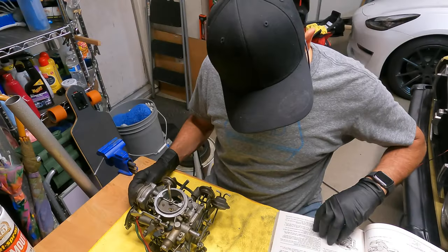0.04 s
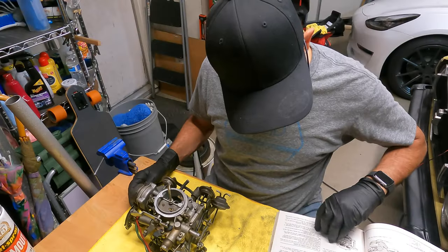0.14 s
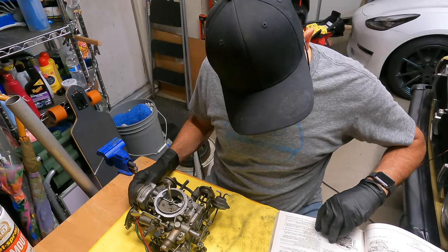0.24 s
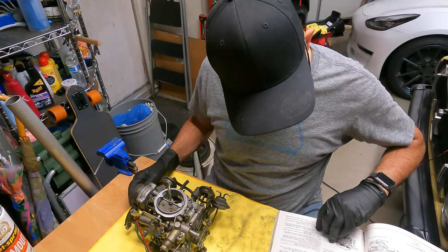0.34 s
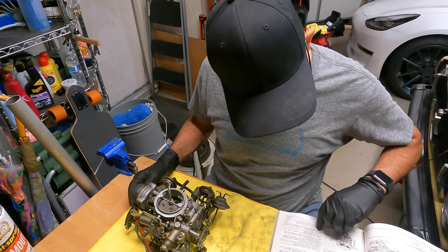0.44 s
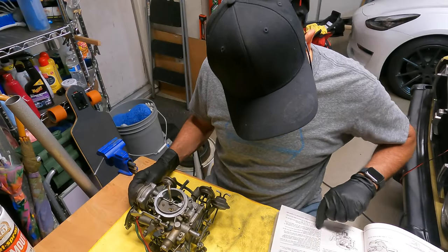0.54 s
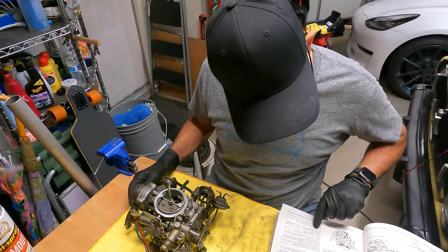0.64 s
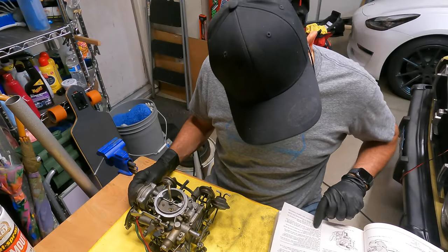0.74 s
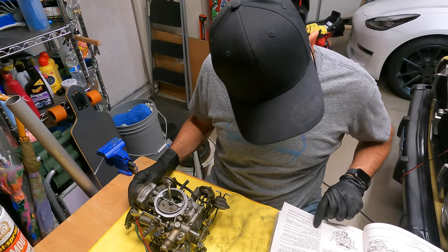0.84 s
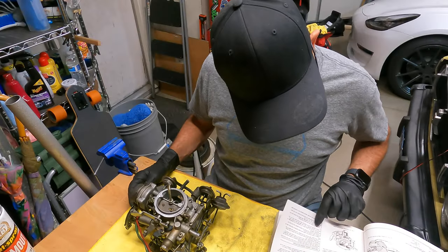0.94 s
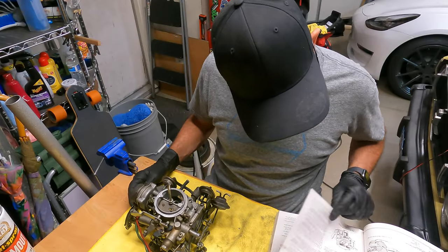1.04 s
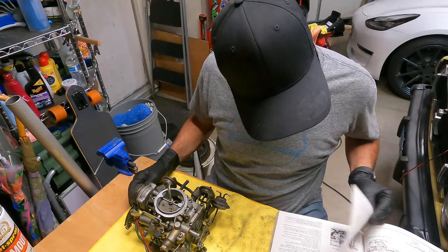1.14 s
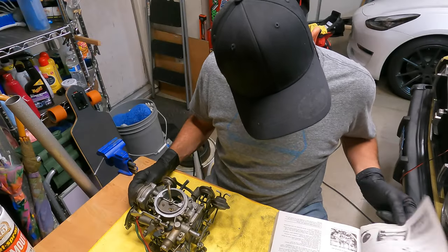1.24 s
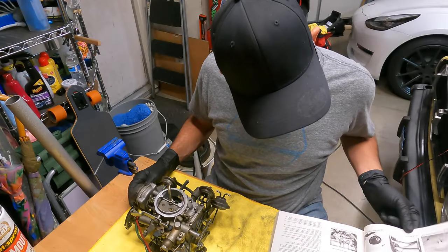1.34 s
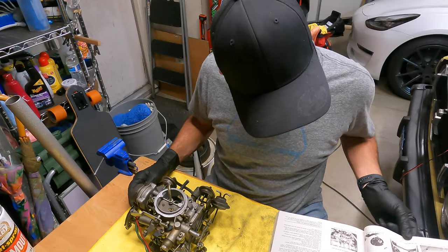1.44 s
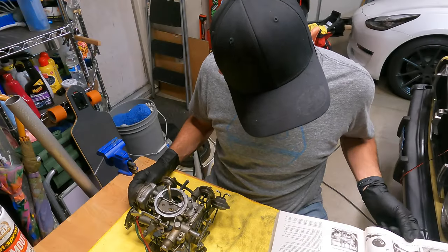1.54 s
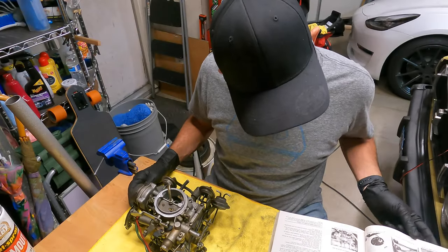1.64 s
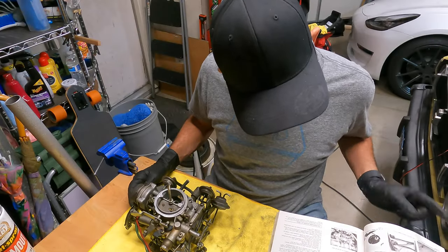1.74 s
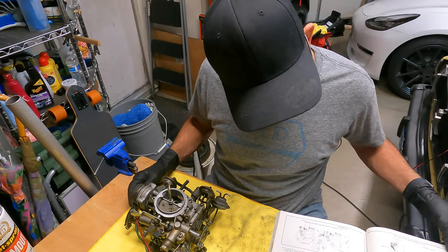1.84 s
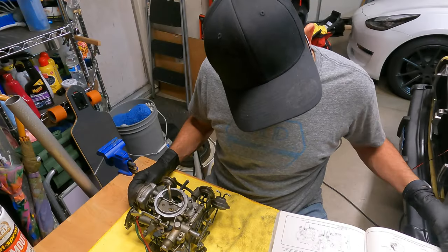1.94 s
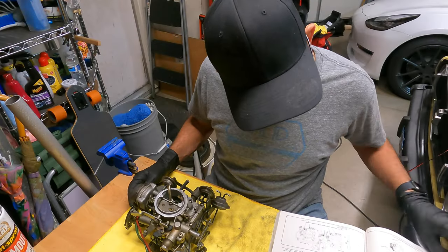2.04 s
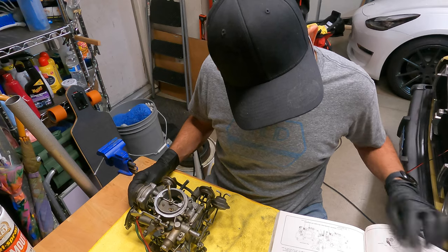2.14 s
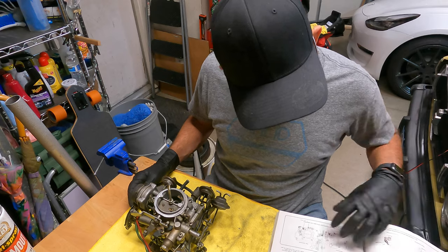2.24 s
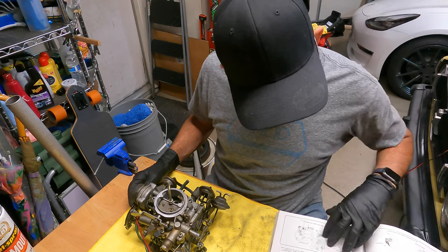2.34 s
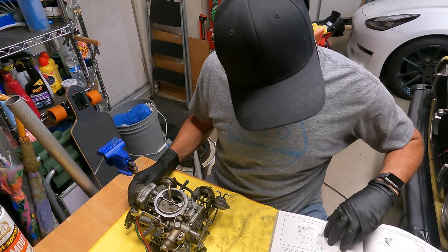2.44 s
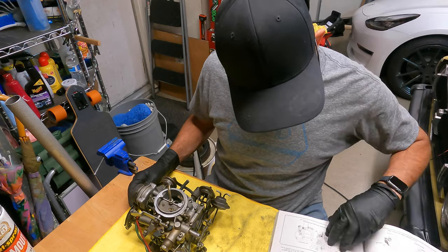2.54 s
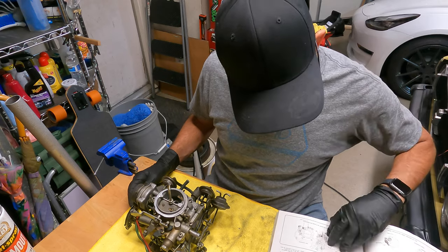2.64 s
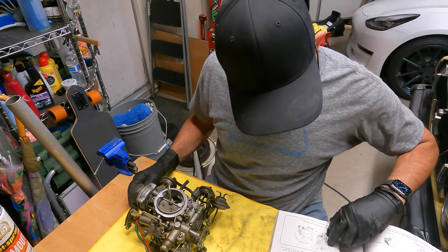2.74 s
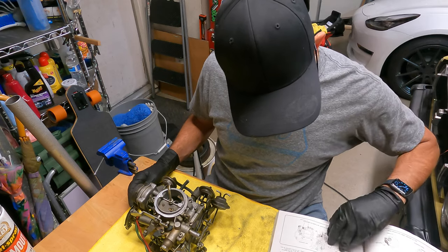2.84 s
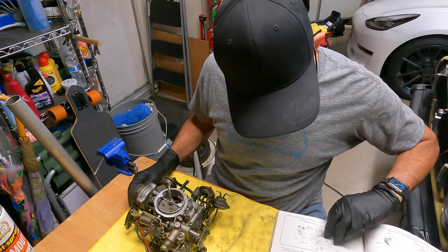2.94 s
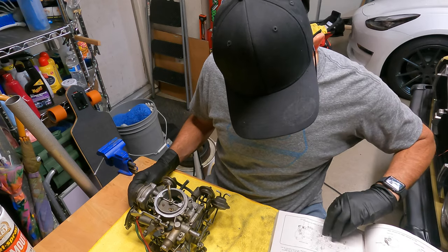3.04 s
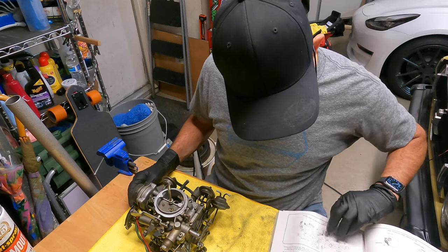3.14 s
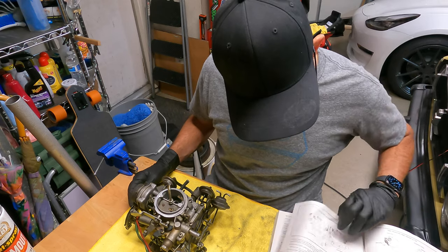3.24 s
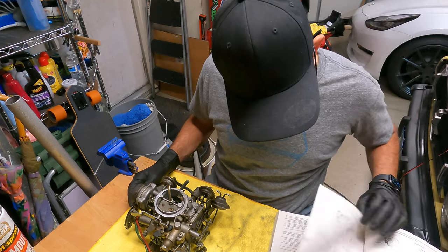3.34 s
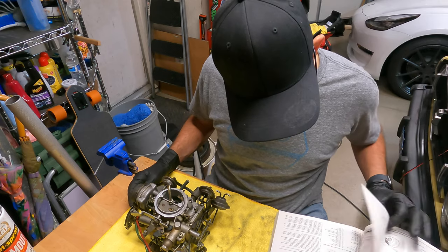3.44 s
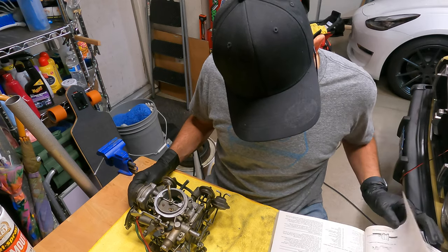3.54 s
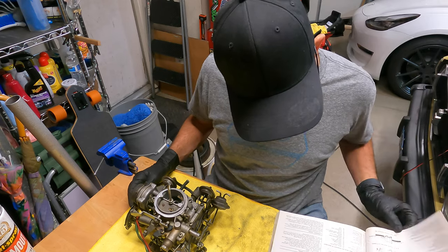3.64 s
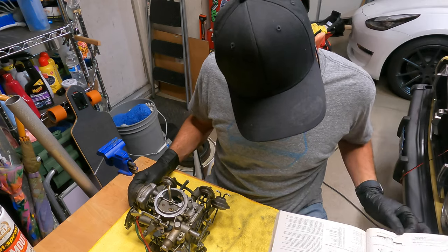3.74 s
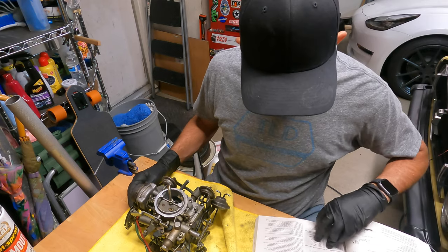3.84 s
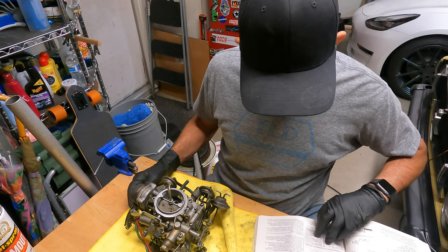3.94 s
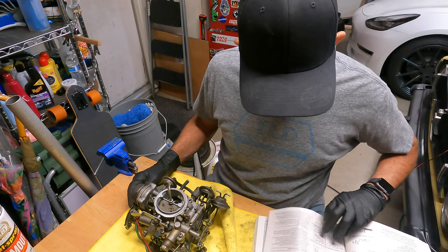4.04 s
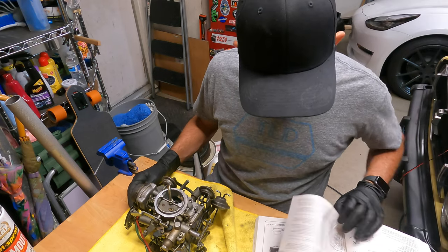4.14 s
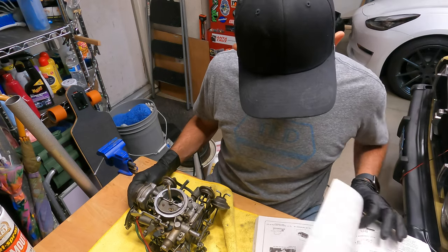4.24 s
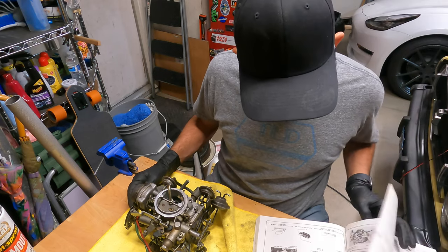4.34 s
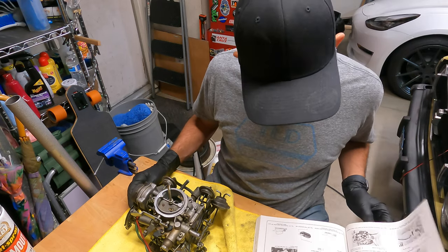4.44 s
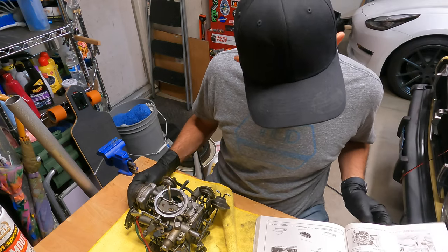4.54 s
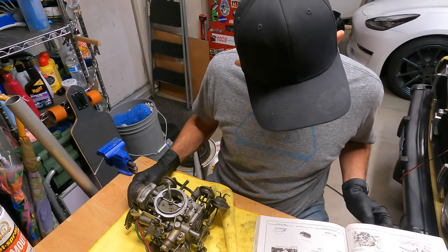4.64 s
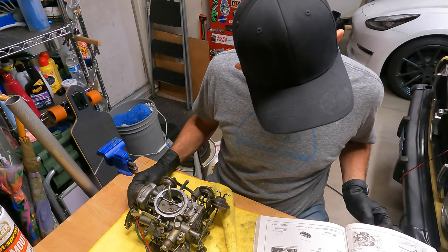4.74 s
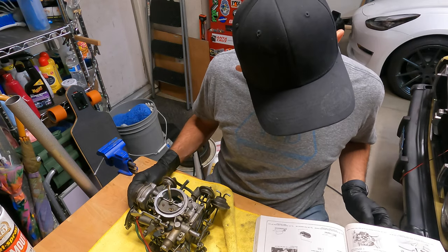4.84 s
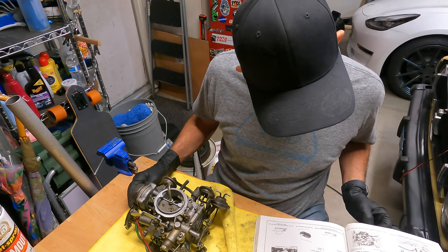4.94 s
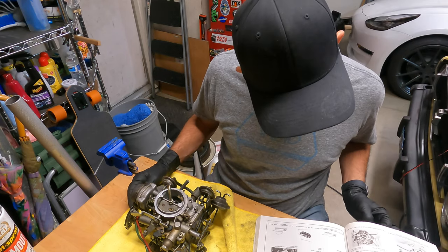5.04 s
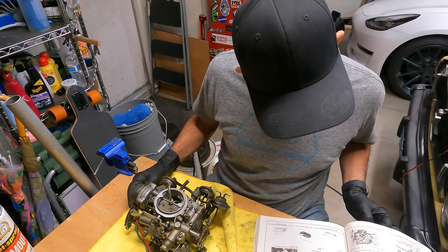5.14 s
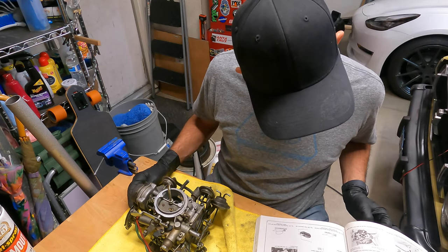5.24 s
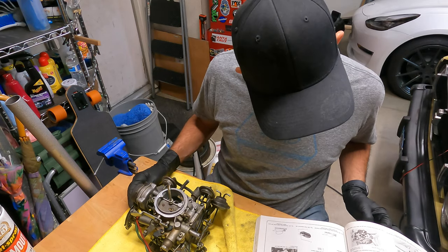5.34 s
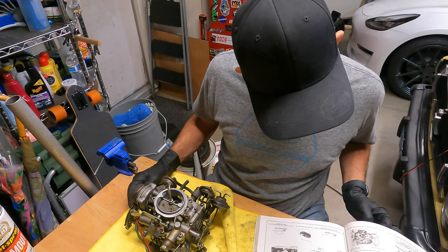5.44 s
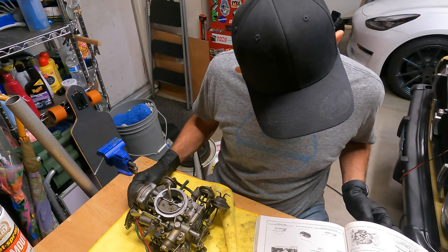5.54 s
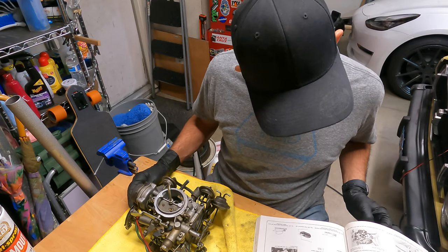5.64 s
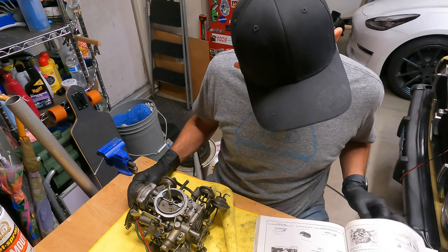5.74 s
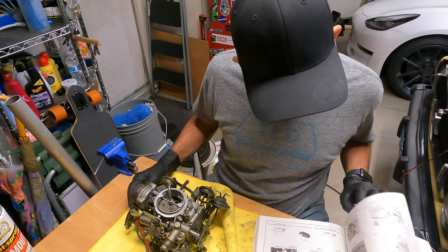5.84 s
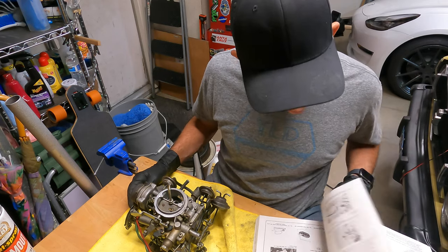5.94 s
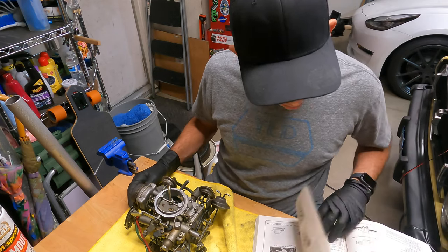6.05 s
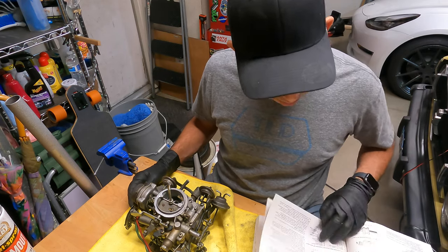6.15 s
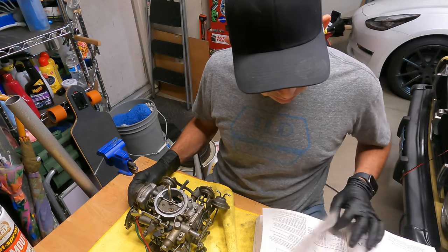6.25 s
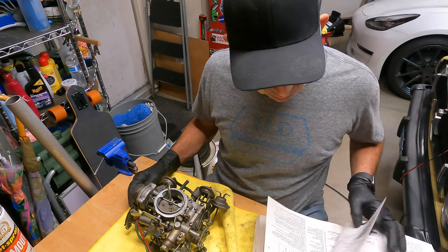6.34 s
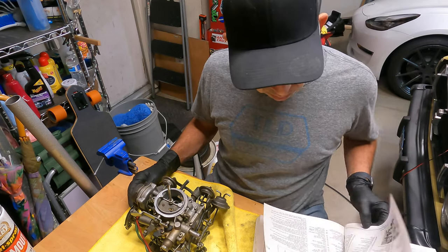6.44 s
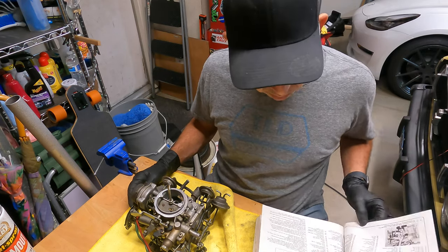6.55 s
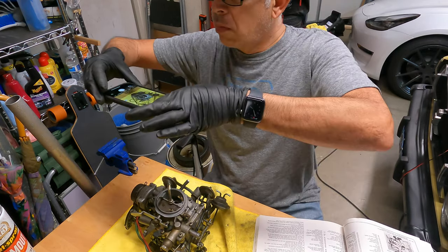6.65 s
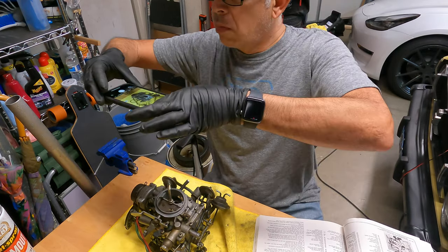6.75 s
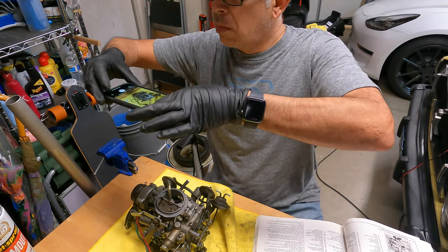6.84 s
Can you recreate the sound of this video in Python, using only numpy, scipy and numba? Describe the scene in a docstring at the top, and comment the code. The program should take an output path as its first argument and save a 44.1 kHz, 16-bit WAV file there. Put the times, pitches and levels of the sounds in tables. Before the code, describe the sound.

A close stereo microphone in a quiet garage picks up a paper manual being leafed through, slightly right of centre, with quick reflections and a short room tail. Light brushing starts at once, with a crisp corner flick at 0.6 s. Hissing slides and a soft bend follow at 1.2-1.6, then a bright swish at 1.7 that stops short near 1.9. A brief swish and low puff of air come at 2.1, then faint brushing. At 3.2-3.6 a page flips with strong crackling flaps and a puff. Small snaps at 4.1 lead to sharp flaps at 4.3 and 4.4. From 4.7 to 5.7 only faint rubbing remains while a distant low engine drone, strongest around 5, fades. At 5.8-6.6 comes a busy flurry, loudest around 6.03, with flicks and another puff. The rustle cuts off at 6.65, leaving low rumble and faint room noise.

```python
"""A quiet garage: a gloved hand leafs through a paper manual on a workbench.
Sliding sheets are noise with random catches, pitched by tightness and shaped stroke by stroke.
Bending or landing pages are short runs of snaps through a ringing patch; swung pages puff low noise.
Clutter and walls answer the rustle as decaying noise echoes.
Behind lie a swelling low rumble, far engine tones and faint room noise."""
import sys
import numpy as np
from scipy import signal
from scipy.fft import rfft, irfft, next_fast_len
from scipy.io import wavfile
from scipy.ndimage import uniform_filter1d, minimum_filter1d, map_coordinates
from numba import njit

SR = 44100
rng = np.random.default_rng(int(sys.argv[2]) if len(sys.argv) > 2 else 0)


def store_pcm(level_fs):
    """Save levels as 16-bit WAV."""
    pcm = np.round(np.clip(level_fs, -1, 1) * 32767).astype(np.int16)
    wavfile.write(sys.argv[1], SR, np.atleast_2d(pcm).T)


N = 304201
TIME = np.arange(N) / SR


def undb(db):
    """Decibels to gain."""
    return 10 ** (np.asarray(db) / 20)


def unit(x):
    """Scale to rms 1."""
    return x / np.sqrt(np.mean(x ** 2))


def colour(x, points):
    """Minimum-phase filter through (Hz, dB) points, built from the folded cepstrum."""
    size = next_fast_len(len(x) // 2 + 2048) * 2
    point_hz, point_db = np.transpose(points)
    hz = np.maximum(np.fft.rfftfreq(size, 1 / SR), 1)
    response_db = np.interp(np.log(hz), np.log(point_hz), point_db)
    cepstrum = irfft(np.log(undb(response_db)))
    cepstrum[1:size // 2] *= 2
    cepstrum[size // 2 + 1:] = 0
    return irfft(rfft(x, size) * np.exp(rfft(cepstrum)))[:len(x)]


def lowpass(x, cutoff_hz):
    """Zero-phase low-pass, so that x minus it is the matching high band."""
    sos = signal.butter(3, min(cutoff_hz, .45 * SR), fs=SR, output="sos")
    return signal.sosfiltfilt(sos, x)


def walk(rate_hz):
    """Slow chance: random levels held 1 / rate_hz and slewed; spread near 1."""
    hold = max(int(SR / rate_hz), 1)
    levels = np.repeat(rng.standard_normal(N // hold + 1), hold)
    return 1.2 * uniform_filter1d(levels, hold)[:N]


def add(out, start_s, x):
    """Mix x into out at start_s."""
    i = max(int(start_s * SR), 0)
    out[i:i + len(x)] += x[:N - i]


def even(x, bins=120):
    """Level the broad peaks of a burst's spectrum, so that a run of snaps excites all pitches alike."""
    spectrum = rfft(x, 2 * len(x))
    power = uniform_filter1d(uniform_filter1d(np.abs(spectrum) ** 2, bins), bins)
    return irfft(spectrum / np.sqrt(power))[:len(x)]


@njit
def resonate(x, centre_hz, width_hz):
    """State-variable band-pass with a moving centre, gain 1 there."""
    y, band, low = np.empty(len(x)), 0., 0.
    for i in range(len(x)):
        g = np.tan(np.pi * centre_hz[i] / SR)
        k = width_hz / centre_hz[i]
        v = (band + g * (x[i] - low)) / (1 + g * (g + k))
        band = 2 * v - band
        low = low + 2 * g * v
        y[i] = k * v
    return y


def wide(points, side_db):
    """Coloured noise, mostly shared by both channels; side_db is the opposed part against it."""
    mid = unit(colour(rng.standard_normal(N), points))
    side = unit(colour(rng.standard_normal(N), points))
    return mid + undb(side_db) * side * np.array([[1], [-1]])


# low rumble, mean level: time_s, level_db
RUMBLE_LEVEL = [(0, -51.5), (1.1, -49.5), (1.45, -46), (2.6, -49), (3.7, -51), (4.1, -42.5), (5.0, -49.5),
                (5.3, -44), (5.7, -46), (6.9, -50.5)]
# rumble spectrum, relative: freq_hz, density_db_per_hz
RUMBLE_COLOUR = [(15, -10), (27, 1), (40, 0.5), (55, 3.5), (66, 2), (86, -4.5), (105, -0.5), (135, -7),
                 (180, -8), (260, -16), (400, -35.5), (800, -59.5), (4000, -115)]
# room noise spectrum, relative: freq_hz, density_db_per_hz
AIR_COLOUR = [(150, 1.5), (300, -4), (450, -10), (850, -18.5), (1250, -10.5), (1700, -18), (2500, -27),
              (4000, -31), (7000, -29.5), (9000, -42), (11500, -41), (12000, -30.5), (12500, -60.5),
              (15500, -62.5)]


def background(lumps_db=2, lumps_hz=14, air_db=-58.5, air_waver_db=0.45, air_waver_hz=3.9):
    """Low rumble that swells and sinks unevenly, under faint, nearly steady room noise."""
    time_s, level_db = np.transpose(RUMBLE_LEVEL)
    swell_db = np.interp(TIME, time_s, level_db)
    rumble = wide(RUMBLE_COLOUR, side_db=-24.5) * undb(swell_db + lumps_db * walk(lumps_hz))
    air = wide(AIR_COLOUR, side_db=-2.5) * undb(air_db + air_waver_db * walk(air_waver_hz))
    return rumble + air


# far engine tones, mean pitch and level at the peak: pitch_hz, level_db, loudest_s, half_length_s (to 1/e)
DRONE_TONES = [(49.7, -50, 4.8, 1.1), (75.2, -46, 5.0, 1), (99.3, -54.5, 4.6, 0.36),
               (116.4, -55.5, 4.7, 1.7), (145.7, -57, 4.6, 0.31)]


def drone(wander_hz=1.2, waver_db=2):
    """Low engine tones through the walls: sines that wander a little, swell in turn and fade."""
    out = 0
    for pitch_hz, level_db, loudest_s, half_length_s in DRONE_TONES:
        phase = 2 * np.pi * np.cumsum(pitch_hz + wander_hz * walk(3.0)) / SR
        gain = np.sqrt(2) * undb(level_db + waver_db * walk(4.6))
        swell = np.exp(-((TIME - loudest_s) / half_length_s) ** 2)
        out = out + gain * swell * np.sin(phase)
    return out


# air pushed by a swinging page: peak_s, level_db (noise rms at the peak)
PUFFS = [(0.659, -45.5), (2.11, -37), (3.42, -37), (4.517, -37), (6.478, -38)]


def puffs(rise_s=0.0067, top_hz=170):
    """A swinging page fans a soft push of air: low noise that rises fast and dies away."""
    out = np.zeros(N)
    t = np.arange(SR // 8) / SR
    swell = t / rise_s * np.exp(1 - t / rise_s)
    for peak_s, level_db in PUFFS:
        push = unit(lowpass(rng.standard_normal(len(t)), top_hz))
        add(out, peak_s - rise_s, undb(level_db) * push * swell)
    return out


# rise and fall of a stroke at FIRM_DB; both times double for every SLOWER_DB below it
STROKE_ATTACK_S, STROKE_RELEASE_S, FIRM_DB, SLOWER_DB = 0.014, 0.015, -43, 14.5
# brushing before and after a stroke: level against the stroke, fading time at FIRM_DB
BRUSH_DB, BRUSH_S = -15, 0.036
# tightness: edge against the hiss at BEND_HZ, and its rise with pitch
RUB_EDGE_DB, BEND_HZ, RUB_EDGE_DB_PER_OCTAVE = 1, 4330, 13.5
# pushes of paper over paper, before sliding()'s trim: start_s, length_s, hiss_level_db,
# body_db (hollow body against the hiss), hiss_pitch_hz
STROKES = [(0.024, .08, -55.5, 2, 4780), (0.202, .075, -52.5, -0.5, 3404),
           (0.468, 0.025, -55.5, -2.5, 3320), (0.522, 0.12, -49, 0, 4060), (0.602, .06, -40, 1, 3520),
           (0.721, 0.063, -48, -6, 3980), (1.01, .025, -68, 3, 4590), (1.314, .028, -49.5, 0.5, 6170),
           (1.384, .105, -41.5, -7, 4810), (1.487, .07, -55.5, 19, 5000), (1.7, .05, -38.5, -3, 4860),
           (1.758, .115, -48, 2.5, 4500), (2.058, .055, -35.5, -9.5, 5150), (2.174, .1, -48.5, 7, 4290),
           (2.301, 0.11, -56, 8.5, 4500), (2.527, .045, -50.5, -1, 3890), (2.619, .11, -52.5, 6.5, 4240),
           (2.956, .26, -59, 2.5, 4164), (3.061, 0.046, -50, 1, 3600), (3.228, 0.055, -45.5, -9.5, 4600),
           (3.297, .08, -58, 8.5, 5080), (3.465, 0.061, -44.5, 3.5, 4165), (3.549, 0.068, -45.5, 2, 4920),
           (3.611, .075, -50, 5, 4695), (3.945, 0.14, -57.5, 5.5, 4400), (4.087, 0.16, -52, 5, 4920),
           (4.328, 0.07, -51.5, 14, 4426), (4.393, .12, -47, 9, 4024), (4.608, 0.097, -60.5, 7.5, 4680),
           (4.726, .15, -56, -2, 4200), (5.069, .125, -61.5, 2.5, 3670), (5.243, .04, -60.5, 8.5, 3900),
           (5.335, 0.031, -67, -1, 4005), (5.83, 0.056, -45.5, 4, 4780), (5.863, 0.17, -40, 2.5, 4520),
           (6.062, .09, -49, 16.5, 4220), (6.163, 0.2, -55.5, 6.5, 4890), (6.286, 0.11, -48, 8.5, 5690),
           (6.411, 0.056, -47.5, -1, 4225), (6.453, .075, -41, 8, 4370), (6.58, 0.084, -64, 12, 4880)]


def strokes():
    """Hiss gain, body gain against it and hiss pitch over time; where strokes overlap the louder leads."""
    hiss, body = np.full(N, 1e-14), np.full(N, 1e-14)  # power floor
    pitch = np.full(N, 1e-14 * BEND_HZ)
    for start_s, length_s, hiss_level_db, body_db, hiss_pitch_hz in STROKES:
        near = np.abs(TIME - start_s - length_s / 2) < .5
        t = TIME[near] - start_s
        slow = 2 ** ((FIRM_DB - hiss_level_db) / SLOWER_DB)
        rise = (1 + np.tanh(2 * t / (slow * STROKE_ATTACK_S))) / 2
        fall = (1 - np.tanh(2 * (t - length_s) / (slow * STROKE_RELEASE_S))) / 2
        # the glove already brushes the page before a stroke and lingers after it
        outside_s = np.maximum(np.abs(t - length_s / 2) - length_s / 2, 0)
        brush = undb(BRUSH_DB) * np.exp(-outside_s / (slow * BRUSH_S))
        power = undb(hiss_level_db) ** 2 * ((rise * fall) ** 2 + brush ** 2)
        hiss[near] += power
        body[near] += power * undb(body_db) ** 2
        pitch[near] += power * hiss_pitch_hz
    return np.sqrt(hiss), np.sqrt(body / hiss), pitch / hiss


# hiss level at which the pitched ring is halved
DAMPED_DB = -48
# hollow resonance of the bowed sheet: wander is octaves per unit of walk()
BOW_HZ, BOW_WIDTH_HZ, BOW_WANDER_OCTAVES, BOW_RATE_HZ, BOW_GAIN = 1450, 210, .35, 14, 1
# sliding paper spectrum, relative: freq_hz, density_db_per_hz
RUB_COLOUR = [(100, -5.5), (250, -9), (430, -5), (650, -3), (850, -10), (1300, 2), (2300, 0.5), (3800, 0),
              (5600, -2), (7500, -10), (10000, -19), (12500, -24.5), (15500, -51)]


def sliding(trim_db=1.0, catch_rate_hz=600, catch_db=-3.5, catch_spread_db=2.5, judder_db=2.0,
            wobble_db=1.9, body_hz=2200, edge_hz=6800, ring_gain=0.87, ring_width_hz=800):
    """Fibres brush past each other and now and then catch; sheet body and edge radiate the friction."""
    hiss_gain, hollow, pitch_hz = strokes()
    sizes = undb(catch_spread_db * np.minimum(rng.exponential(size=N), 5))
    caught = rng.random(N) < catch_rate_hz / SR
    catches = caught * sizes * rng.choice([-1, 1], N)
    friction = colour(rng.standard_normal(N) + undb(catch_db) * unit(catches), RUB_COLOUR)
    # a light touch leaves the sheet free to ring
    ring = ring_gain / (1 + hiss_gain / undb(DAMPED_DB))
    friction = unit(friction + ring * resonate(friction, pitch_hz, float(ring_width_hz)))
    body, below_edge = lowpass(friction, body_hz), lowpass(friction, edge_hz)
    # the hollow resonance wanders as the sheet's curve changes
    bow_hz = np.clip(BOW_HZ * 2 ** (BOW_WANDER_OCTAVES * walk(BOW_RATE_HZ)), 1, SR / 4)
    bow = resonate(body, bow_hz, float(BOW_WIDTH_HZ))
    body = (body + BOW_GAIN * bow) / np.sqrt(1 + BOW_GAIN / 2)
    # the loose sheet wobbles on its own
    body_gain = hollow * undb(wobble_db * walk(110))
    # a tighter bend hisses higher and sheds more from its edge
    edge_db = RUB_EDGE_DB + RUB_EDGE_DB_PER_OCTAVE * np.log2(pitch_hz / BEND_HZ)
    x = body * body_gain + below_edge - body + (friction - below_edge) * undb(edge_db)
    # the hand never moves evenly
    return x * hiss_gain * undb(trim_db + judder_db * walk(70))


# flapping sheet spectrum, relative: freq_hz, density_db_per_hz
FLAP_COLOUR = [(50, -33), (140, -3), (260, -11), (430, -10.5), (750, -6.5), (1200, -0.5), (2200, 0.5),
               (3600, -5.5), (5200, -8), (7000, -18.5), (9500, -34), (12500, -40.5), (15500, -61.5)]


def buckle(level_db, length_ms, crack_db, edge_db, patch_hz, diffuse, snaps_per_ms=1.8, spread_db=3.5,
           flutter_db=-22, flutter_s=0.0042, ring_gain=1.0, damping=0.13):
    """A crease runs across the sheet in a few snaps; the sheet flutters briefly after each."""
    t = np.arange(SR // 10) / SR
    count = min(1 + int(length_ms * snaps_per_ms), 64)
    place, size = rng.random(count), rng.standard_normal(count)
    sign = rng.choice([-1, 1], count)
    at = (np.arange(count) + place) / count * length_ms * SR / 1000  # samples
    if diffuse:  # summed over all directions the snaps merge into one pulse
        run = signal.unit_impulse(len(t), int(at.mean()))
    else:
        snaps = np.bincount(at.astype(int), sign * undb(spread_db * np.minimum(size, 1)), len(t))
        flutter = undb(flutter_db) * rng.standard_normal(len(t)) * np.exp(-t / flutter_s)
        flutter[0] = 1
        run = even(signal.fftconvolve(snaps, flutter)[:len(t)])
    # the bent patch rings for a few cycles
    patch = resonate(run, np.full(len(t), float(patch_hz)), float(damping * patch_hz))
    run = run + ring_gain * patch
    # a tight crease is bright, a broad slack bend is hollow
    tightness = [(1700, 0.013), (3300, crack_db), (5000, crack_db),
                 (8500, crack_db + edge_db), (13000, crack_db + edge_db / 2)]
    x = colour(colour(run, FLAP_COLOUR), tightness)
    return x * undb(level_db) * np.sqrt(SR / 100 / np.sum(x ** 2))  # energy as rms over 10 ms


# edge falls to 0 dB against the crack at EDGE_AT_DB
EDGE_AT_DB, EDGE_LOSS_DB_PER_DB = -28.5, 0.7
# flicks: crack against the body, pitch of the corner
FLICK_CRACK_DB, FLICK_HZ = 20, 4130
# a sheet bends over or lands, before the room: start_s, level_db (rms over 10 ms), run_length_ms,
# crack_db (4 kHz against body), patch_hz
FLAPS = [(0.297, -48, 3.3, -7.5, 1410), (0.34, -48, 2.45, -5, 1170), (0.591, -33, 0.46, -30.5, 1110),
         (1.238, -32, 11.3, -16.5, 1230), (1.515, -32.5, 30.4, -16, 1140), (1.706, -31.5, 11, 3, 4040),
         (1.74, -38, 9.8, -10, 1200), (1.831, -38, 6, -6, 1400), (2.684, -42, 3, 10.5, 1550),
         (2.696, -35.5, 4.8, 0, 2230), (3.189, -48.5, 1.2, -16.5, 1140), (3.368, -40, 1.9, -17, 1460),
         (3.3914, -27, 2.9, -2.5, 1290), (3.3991, -20.5, 5.4, -2.5, 1440), (3.4152, -16.5, 5, 4, 1350),
         (3.423, -23.5, 17.3, -11, 1400), (3.451, -27.5, 14.3, -17, 1150), (3.578, -28, 11, -12.5, 1880),
         (4.006, -37.5, 3.95, -5, 1220), (4.1105, -29, 1.22, -1, 1500), (4.133, -28.5, 1.12, 0, 1730),
         (4.216, -42.5, 3.8, -17, 1100), (4.304, -32, 1.15, -6, 1170), (4.309, -21, 3.4, 3, 1166),
         (4.363, -35, 6, -15, 1200), (4.4303, -18.5, 5.5, 3.5, 1510), (5.056, -43, 7.2, -19.5, 1320),
         (5.858, -37, 7.3, -24.5, 1390), (5.898, -29.5, 2, 13, 1480), (5.912, -32.5, 12, -19, 1210),
         (5.966, -27.5, 6.8, 3.5, 1790), (6.026, -24, 7.2, -16.5, 2210), (6.0331, -14, 6.7, 1, 1660),
         (6.042, -17.5, 6.5, 13.5, 2140), (6.049, -22.5, 7.3, -19.5, 1940), (6.078, -33.5, 20, 7, 1600),
         (6.111, -36.5, 3.3, 2, 1750), (6.261, -39.5, 7, -7, 1210), (6.328, -30, 5.5, -7.5, 1680),
         (6.342, -24, 2.16, -14, 1710), (6.358, -27.5, 8.8, -13.5, 1370), (6.397, -36, 19, -17, 1170),
         (6.563, -35.5, 4.5, -4.5, 2055)]
# a taut corner flicks free, before the room: start_s, level_db (rms over 10 ms), run_length_ms,
# edge_db (above 8.5 kHz against crack)
FLICKS = [(0.6155, -21.5, 1, 15.5), (2.46, -46, 3, 12), (6.1335, -24, 0.45, 11.5),
          (6.4663, -22.5, 15.5, 12.5)]


def buckles(diffuse):
    """Flaps and flicks: the harder the flap, the more sheet moves and the less its edge stands out."""
    out = np.zeros(N)
    for start_s, level_db, length_ms, crack_db, patch_hz in FLAPS:
        edge_db = -EDGE_LOSS_DB_PER_DB * (level_db - EDGE_AT_DB)
        add(out, start_s, buckle(level_db, length_ms, crack_db, edge_db, patch_hz, diffuse))
    for start_s, level_db, length_ms, edge_db in FLICKS:
        add(out, start_s, buckle(level_db, length_ms, FLICK_CRACK_DB, edge_db, FLICK_HZ, diffuse))
    return out


def garage(toward, around, early_db=-10, early_s=0.02, tail_db=-13, t60_low_s=0.32, t60_high_s=.3,
           split_hz=5500, side_db=-2, direct_db=-2.0, lag_ms=0.014, left_db=1.0, right_db=2.0):
    """Direct sound, quick reflections from nearby clutter and a short room tail."""
    t = np.arange(SR * 3 // 4) / SR

    def fade(t60_s):
        return np.exp(-np.log(1000) * t / t60_s)

    def share(h, level_db):
        return h * undb(level_db) / np.sqrt(np.sum(h ** 2))

    def reflections():
        early, late = rng.standard_normal((2, len(t)))
        low = lowpass(late, split_hz)
        tail = low * fade(t60_low_s) + (late - low) * fade(t60_high_s)
        tail = tail * np.clip(t / 0.007, 0, 1)
        early = early * np.exp(-t / early_s) * (t > .001)
        h = share(early, early_db) + share(tail, tail_db)
        return signal.fftconvolve(around, h)[:N]

    direct = undb(direct_db) * toward
    mid = reflections()
    side = undb(side_db) * reflections()
    # the book lies a little to the right: the left gets it later and softer
    later = map_coordinates(direct, [np.arange(N) - lag_ms * SR / 1000], order=3)
    return np.array([undb(left_db) * later + mid + side, undb(right_db) * direct + mid - side])


# rustle stops short, echo and all: start_s, end_s
STOPS = [(1.879, 2.032), (6.649, 7.7)]


def stops():
    """Gain that shuts within a few ms wherever the rustle stops short."""
    shut = sum((TIME > start_s) & (TIME < end_s) for start_s, end_s in STOPS)
    return uniform_filter1d(1. - shut, size=128)


def scene():
    """The microphone hears the pages directly; the walls hear them from all directions."""
    rub = sliding()
    pages = garage(buckles(diffuse=False) + rub, buckles(diffuse=True) + rub)
    return pages * stops() + puffs() + drone() + background()


def limit(x, ceiling):
    """Peak limiter: the gain dips smoothly for a few ms around any peak over the ceiling."""
    size = SR // 250
    gain = np.minimum(1, ceiling / (np.abs(x).max(axis=0) + 1e-9))
    return x * uniform_filter1d(minimum_filter1d(gain, size), size)


def record(dry, top_hz=15600):
    """The recorder holds down the loudest peaks and cuts steeply above top_hz."""
    held = limit(dry, ceiling=.64)
    return signal.sosfilt(signal.ellip(8, .2, 70, top_hz, fs=SR, output="sos"), held)


dry = scene()
out = record(dry)
store_pcm(out)
```